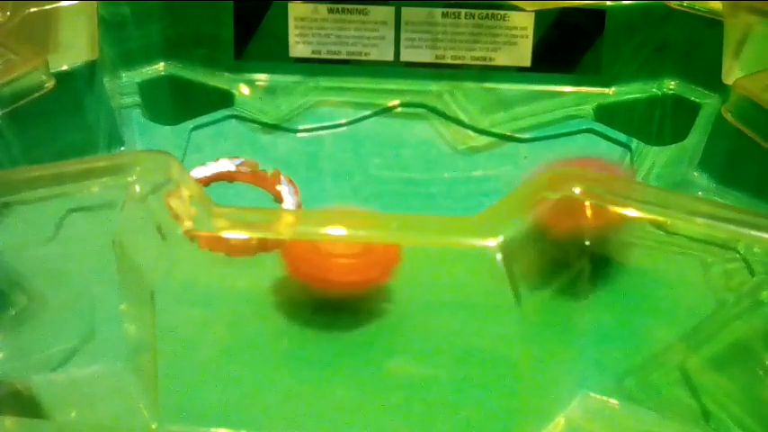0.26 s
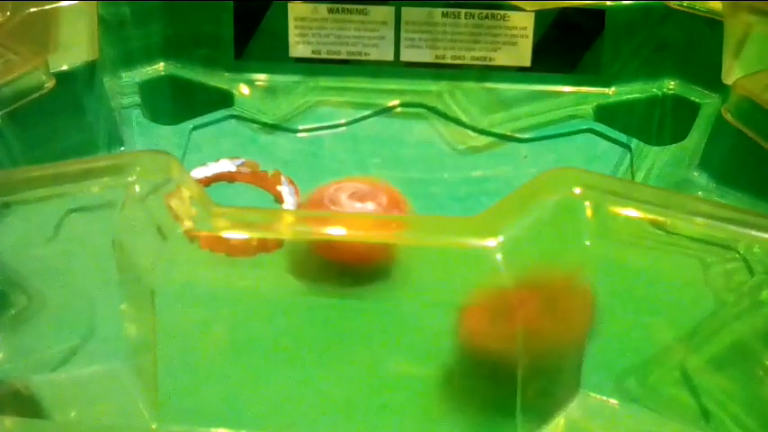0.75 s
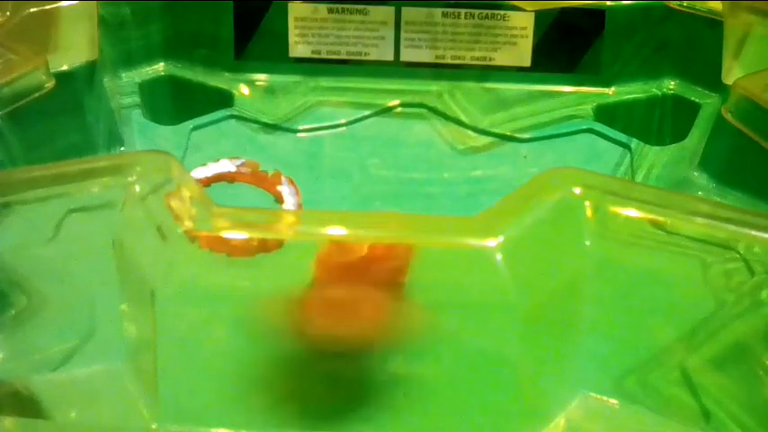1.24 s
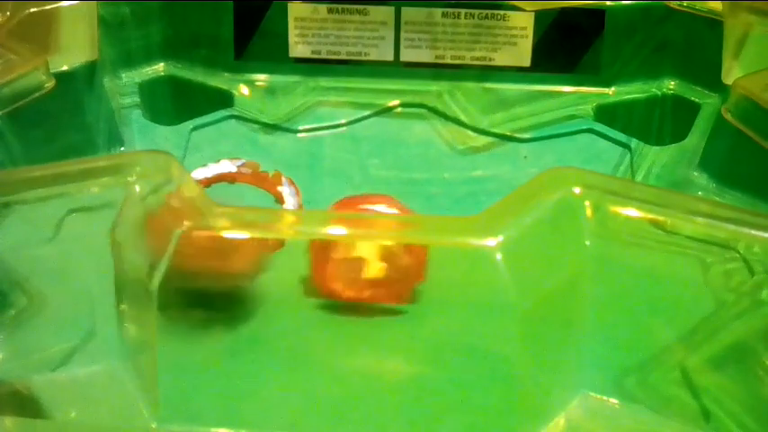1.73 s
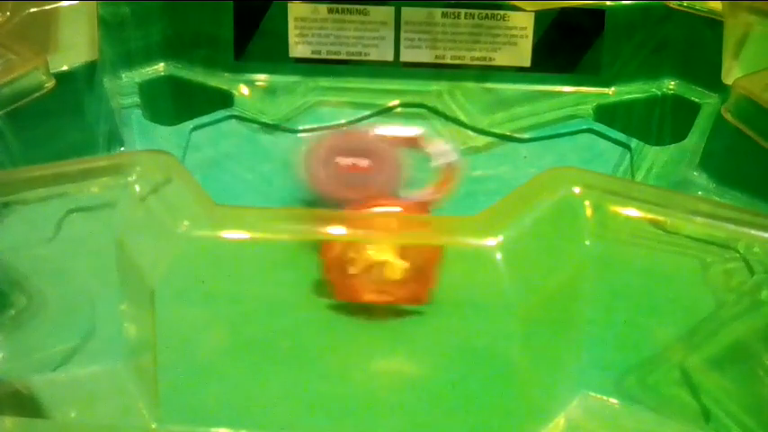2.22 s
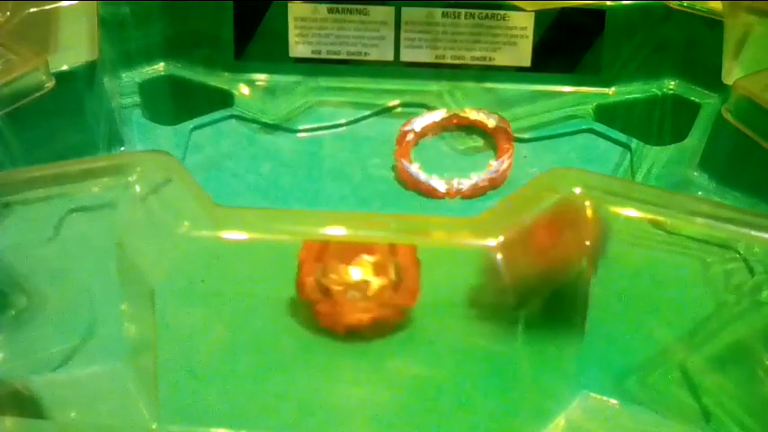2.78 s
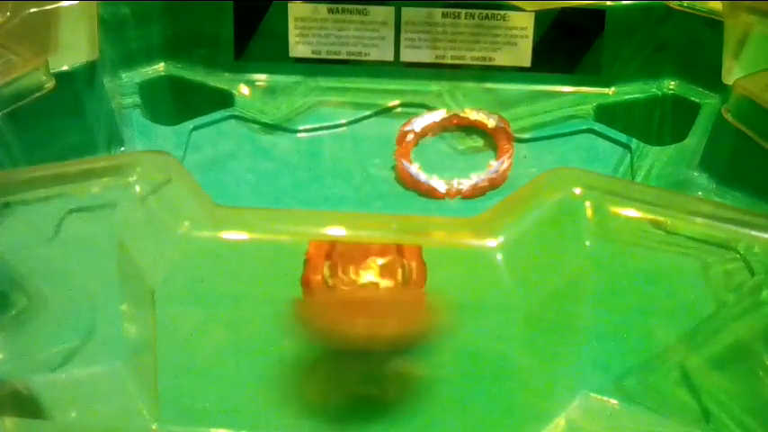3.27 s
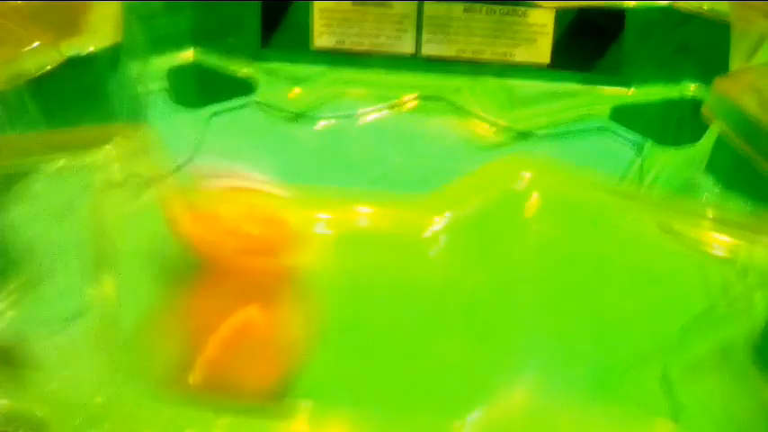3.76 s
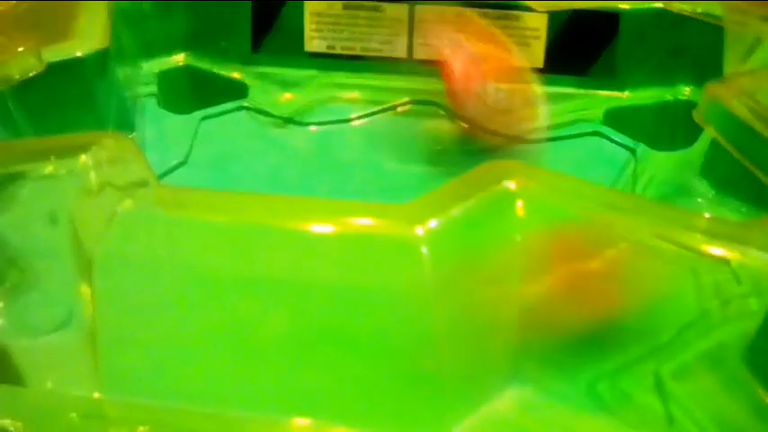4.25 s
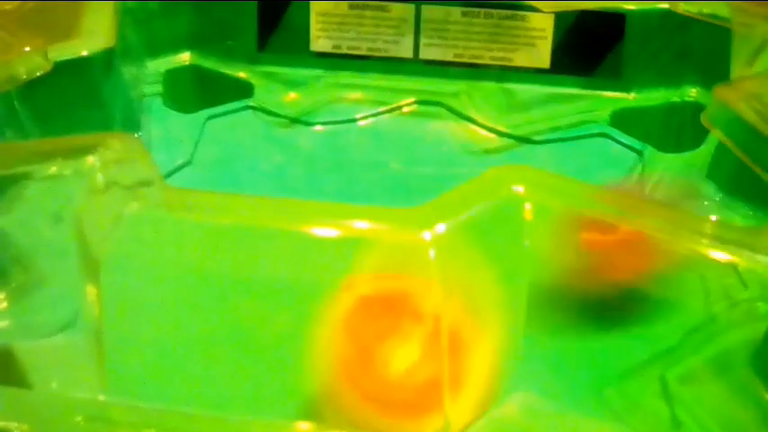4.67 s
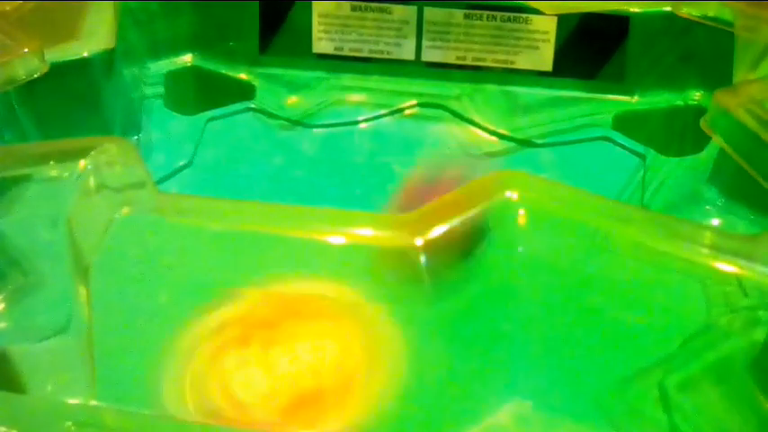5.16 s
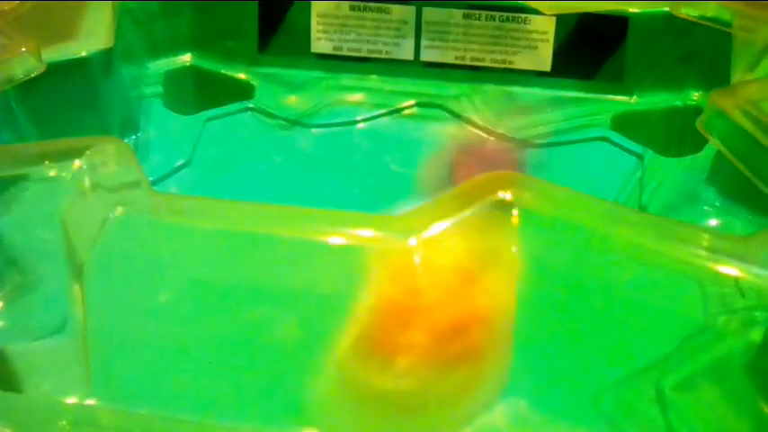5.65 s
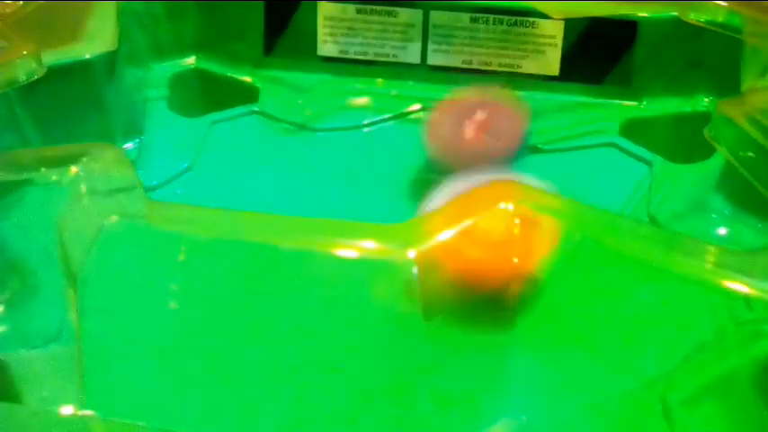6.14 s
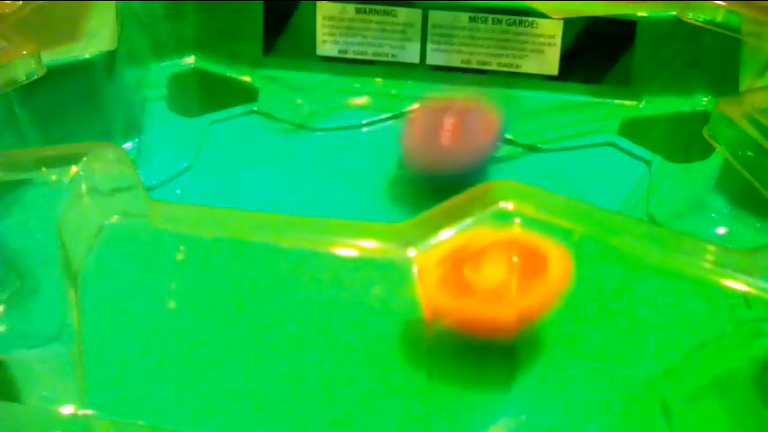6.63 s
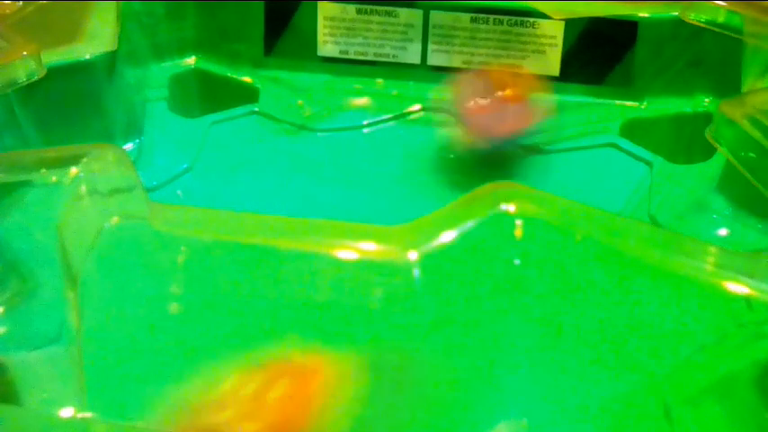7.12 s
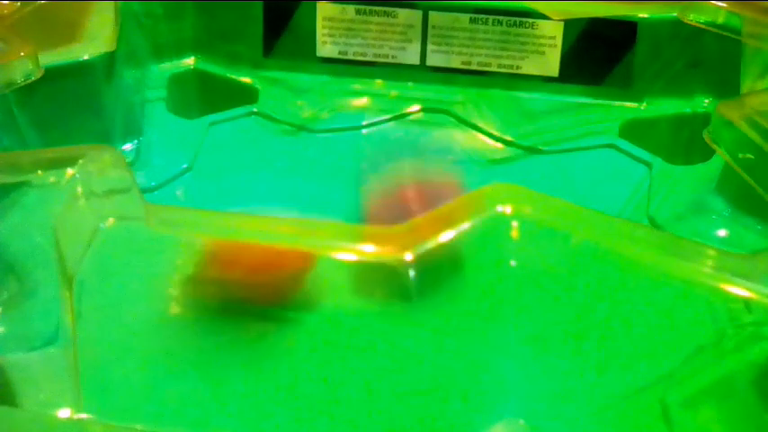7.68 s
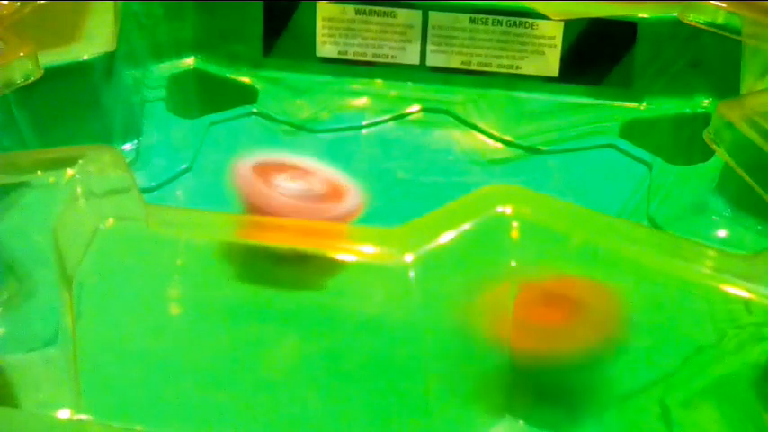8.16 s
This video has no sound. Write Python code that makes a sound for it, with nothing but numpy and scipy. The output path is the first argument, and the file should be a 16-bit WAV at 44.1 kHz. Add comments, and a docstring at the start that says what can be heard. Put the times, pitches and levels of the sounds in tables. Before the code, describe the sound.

Two toy tops spin in a thin plastic arena, heard from close above in a small room. Their tips roll with a faint whirr. Metal rims crack together with a brief high ring at the start and around 0.6, 1.2, 1.8, 2.2 and 3.3 seconds, among soft wall knocks. A short scrape swells from 0.5 to 0.8 seconds.

At 3.4 seconds everything cuts out for an instant. A much louder, hollow-sounding bout follows from 3.5 seconds: rapid chattering knocks on the walls, dull floor thumps, gritty skids and a low rolling rumble. Hard rim clashes land near 3.7, 4.9, 5.5, 6.1 and 6.8 seconds, with the strongest wall knocks at 3.6 and 5.1. Faint ticking appears around 6.4 seconds, and more knocks near 7. From 7.3 seconds the wobbling tops tick lightly and quickly, with two small plastic clacks just after 8 seconds.

```python
"""Two toy tops with metal rims clash as they spin in a thin plastic arena, heard from close above. Rims crack
together, ring and scrape, bodies knock on the walls and tips roll over the floor; every blow is a short chatter
of contacts. After the first bout the scene changes, with a brief gap between the two. The second bout is
heavier, has a hollow doubled sound, and calms to light ticking as the tops wobble."""
import sys
import numpy as np
from scipy import signal
from scipy.fft import rfft, irfft
from scipy.io import wavfile

SR = 44100
rng = np.random.default_rng(int(sys.argv[2]) if len(sys.argv) > 2 else 0)


def write(x):
    x = np.atleast_2d(x).T
    wavfile.write(sys.argv[1], SR, np.round(np.clip(x, -1, 1) * 32767).astype(np.int16))


N = 369999
TIME = np.arange(N) / SR
AGE = np.arange(SR // 2) / SR  # seconds since a blow

# Rim hits rim. Each row: start in seconds, chatter length in seconds, crack in dB, shell thud in dB.
CLASHES = [(-0.05, .006, -26.5, -39), (0.4198, .002, -32.5, -67), (.452, 0.0081, -40.5, -67),
           (.513, .0023, -38.5, -51), (0.557, 0.0098, -37, -53), (.576, 0.0057, -19.5, -31.5),
           (0.783, 0.0023, -33, -78), (1.1747, 0.007, -22.5, -30), (1.389, .002, -44.5, -53),
           (1.604, .0034, -39.5, -78), (1.751, 0.0074, -50.5, -56.5), (2.064, 0.0042, -47.5, -39.5),
           (1.773, 0.0055, -41, -56), (1.784, 0.0055, -20, -31.5), (2.2453, 0.0042, -19.5, -32),
           (3.334, .003, -26.5, -40), (3.571, 0.0059, -35.5, -37.5), (3.715, .01, -12, -23),
           (4.048, 0.0035, -31.5, -27.5), (4.243, 0.0019, -29.5, -40), (4.945, 0.0091, -11, -62),
           (5.537, 0.0085, -11, -25), (5.865, 0.0023, -27.5, -31), (6.065, .013, -16.5, -27.5),
           (6.777, 0.012, -13.5, -27.5)]
# The bright crack, the shell's thud and the wash after them. Each row: frequency in Hz, level in dB.
RIM_CRACK = [(1500, -19.5), (2300, -13.5), (3200, -11.5), (4500, -5), (5600, 1), (6600, 1), (7800, -1.5),
             (9500, -12), (12000, -16.5), (15500, -24.5)]
SHELL_THUD = [(60, -26), (160, 1), (300, -3), (480, -2), (700, 1), (1100, -1), (2000, -6), (3000, -24)]
AFTER_RING = [(70, -13), (170, 11.5), (400, -4.5), (1000, 4), (2000, -8.5), (3300, -7), (5000, -5.5),
              (6500, 5.5), (8000, -1), (10500, -14), (15500, -27.5)]
# The singing metal. Each row: pitch in Hz, level in dB, ring time in seconds.
RIM_MODES = [(4985, -10, .22), (5733, -8, .3), (6148, 0, .45), (6487, -3, .25), (6961, -8, .22),
             (7569, -10, .25), (9399, -15, .2), (10690, -14, .38), (11359, -19, .3), (13517, -26, .25)]
# A longer grind leaves more ring. Each row: chatter length in seconds, ring against the crack in dB.
RING_SHARE = [(.003, -38.5), (.006, -19.5), (.012, -15.5)]


def clashes():
    """Metal rims crack together, jolt the shell, and leave rims and arena ringing."""
    out = np.zeros(N)
    for start, length, crack_db, shell_db in CLASHES:
        contacts = chatter(length, first_db=-7, last_db=-4, bounce_db=-19, scatter_db=4)
        treble_db = 0.42 * min(crack_db + 20.5, 0)  # a graze is duller
        crack = colour(colour(burst(0.011), RIM_CRACK), [(7000, 0.0032), (13000, treble_db)])
        add(out, start, strike(contacts, crack, crack_db))
        add(out, start, strike(contacts, colour(burst(0.065), SHELL_THUD), shell_db))
        wash = undb(0.5) * unit(colour(burst(0.43), AFTER_RING), 0.1)
        # a quick, clean blow lets the rims sing; a long chatter damps them
        sing_db = np.interp(length, [.005, .012], [1, -8])
        metal = undb(sing_db) * unit(ring(RIM_MODES, scatter_db=3.5, detune=.003), .08)
        ring_db = crack_db + np.interp(length, *np.transpose(RING_SHARE))
        add(out, start + length / 2, undb(ring_db) * (wash + metal))
    return out


# Top hits arena. Each row: start in seconds, chatter length in seconds, force in dB,
# favoured resonance in Hz (a low one is a landing on the floor).
KNOCKS = [(1.011, 0.0046, -49, 1045), (1.042, 0.0018, -50, 1130), (1.097, 0.0027, -50.5, 1020),
          (1.801, 0.0089, -33.5, 582), (1.859, 0.0049, -35, 794), (2.005, 0.0034, -39.5, 690),
          (2.1086, 0.0039, -33.5, 784), (2.253, 0.017, -31, 616), (2.285, 0.048, -34, 381),
          (3.525, 0.021, -29.5, 585), (3.6126, .022, -6, 805), (3.868, 0.035, -26, 318),
          (3.9565, 0.011, -23, 837), (3.993, 0.0085, -25.5, 1275), (4.012, .013, -19, 520),
          (4.148, 0.027, -20.5, 565), (4.277, 0.021, -24.5, 389), (4.357, 0.0096, -22, 1097),
          (4.4213, 0.0063, -28.5, 550), (4.465, 0.018, -31, 523), (4.551, 0.02, -20, 753),
          (4.642, 0.0097, -14.5, 978), (4.669, 0.0053, -14, 580), (4.723, 0.01, -17, 840),
          (4.742, 0.02, -14, 749), (4.781, 0.0071, -14, 571), (4.803, 0.017, -19, 547),
          (4.88, 0.0073, -31, 965), (4.99, 0.0076, -25, 195), (5.102, .018, -7, 757),
          (5.1775, 0.0084, -9.5, 854), (5.243, .012, -27, 237), (5.386, 0.0062, -30.5, 597),
          (5.443, .0092, -31.5, 773), (5.611, 0.0095, -14, 515), (5.666, 0.019, -11, 814),
          (5.684, 0.019, -15.5, 183), (5.751, .028, -13.5, 551), (5.8892, 0.015, -20.5, 213),
          (5.9793, 0.009, -25.5, 205), (6.004, 0.0047, -27.5, 330), (6.941, .015, -24, 527),
          (6.973, 0.027, -28.5, 335), (7.055, 0.0082, -21.5, 528), (7.119, .019, -21, 549),
          (7.183, .009, -34, 503), (7.217, .017, -32, 194), (7.602, 0.016, -39, 1052),
          (7.953, 0.0085, -32.5, 759), (8.3433, .015, -37, 775)]
# The walls' knock and the floor's boom. Each row: pitch in Hz, level in dB, ring time in seconds.
WALL_MODES = [(403, 11.5, 0.019), (487, -25, 0.033), (588, 0.5, 0.19), (759, 0, 0.076), (798, 4.5, 0.11),
              (993, 12.5, 0.016), (1128, -20, 0.035), (1280, -2, 0.11), (1688, 1, 0.0083)]
FLOOR_MODES = [(71, -9.5, 0.35), (108.7, -6, 0.22), (193.4, -3, 0.13), (232, -17.5, 0.27),
               (267, -5.5, 0.037), (327.8, -5.5, 0.15)]
# The wall's dull thwack and the sharp crack on top. Each row: frequency in Hz, level in dB.
WALL_THWACK = [(150, -42), (330, -6), (520, 7), (850, 0.5), (1300, 0), (2000, -3), (3000, -34)]
PLASTIC_CRACK = [(1400, -12.5), (2100, 0), (3200, -1.5), (4800, -2), (6600, 1), (8000, -10), (10000, -16.5),
                 (15500, -38)]
# A short blow bites hardest at first touch. Each row: chatter length in seconds, first contact in dB.
FIRST_TOUCH = [(.008, 6), (.016, -0.5), (.03, 0)]


def knocks(rows, extra_crack_db=0):
    """A top hits the arena: the contact cracks, the wall rings and the floor booms."""
    walls, floor = np.zeros(N), np.zeros(N)
    for start, length, force_db, favoured_hz in rows:
        landing = np.interp(favoured_hz, [200, 420], [1, 0])  # 1 on the floor, 0 on the wall
        wall_db = force_db - 5 * landing
        bite_db = np.interp(length, *np.transpose(FIRST_TOUCH))
        contacts = chatter(length, first_db=bite_db, last_db=-5.5, bounce_db=-22.5, scatter_db=5.5)
        add(walls, start, undb(force_db - 4) * flex(contacts, favoured_hz, t60=.044))
        # the longer the top leans on the wall, the more the favoured resonance stands alone
        lean_db = 140 * (min(length, .025) - .012)
        tone = ring(WALL_MODES, scatter_db=-1, detune=0.016)
        add(walls, start, strike(contacts, tone, wall_db - lean_db - 6))
        thwack = colour(burst(0.021), WALL_THWACK)
        add(walls, start, strike(contacts, thwack, wall_db - lean_db - 2.5))
        # past 14 ms a contact is a lean, and its crack fades
        crack_db = wall_db - 3 + extra_crack_db - 550 * max(length - 0.014, 0)
        treble_db = 0.5 * min(crack_db + 33, 0)  # a gentle contact is duller
        crack = colour(burst(0.019) + undb(-16) * burst(0.017), PLASTIC_CRACK)
        crack = colour(crack, [(8000, 0), (14000, treble_db)])
        add(walls, start, strike(contacts, crack, crack_db))
        # a wall hit passes only so much on to the floor
        boom_db = landing * force_db + (1 - landing) * min(force_db - 0.5, -27)
        boom = ring(FLOOR_MODES, scatter_db=1, detune=.02)
        add(floor, start, strike(contacts, boom, boom_db - 1.5, settle=0.016))
    # the thin plastic radiates little deep bass
    return low_cut(walls, hz=90) + low_cut(floor, hz=98)


def flex(contacts, hz, t60):
    """One wall resonance gathers energy from every contact and rings on in step."""
    swing = np.sqrt(np.abs(signal.fftconvolve(fade(t60) ** 2, contacts ** 2)))[:len(AGE)]
    return unit(swing * np.sin(2 * np.pi * hz * AGE), len(contacts) / 2 / SR + 0.0014)


# Runs of light ticking. Each row: first and last tap in seconds, taps per second,
# first and last force in dB.
WOBBLES = [(1.883, 1.944, 33, -40, -41), (2.165, 2.215, 40, -40, -40), (6.325, 6.568, 25, -42, -46),
           (7.329, 7.53, 20, -32, -34), (7.688, 8.122, 18.5, -37, -38)]


def wobble_taps():
    """A leaning top taps the arena once each wobble, each time on some resonance of the wall."""
    rows = []
    for first, last, per_second, first_db, last_db in WOBBLES:
        count = round((last - first) * per_second) + 1
        starts = np.linspace(first, last, count)
        forces_db = np.linspace(first_db, last_db, count) - 1
        for start, db, (softness, place, drag) in zip(starts, forces_db, rng.uniform(-1, 1, (count, 3))):
            hz = WALL_MODES[int(4 * (place + 1))][0]
            length = .012 * 2 ** (drag / 2)
            rows.append((start, length, db - 1.06 * softness, hz))
    return knocks(rows, extra_crack_db=1.5)


# Body hits body. Each row: start in seconds, chatter length in seconds, force in dB, pitch in Hz.
CLACKS = [(6.609, 0.0095, -20.5, 4660), (6.64, 0.018, -31.5, 5100), (8.152, 0.005, -29, 2830),
          (8.284, 0.0051, -21.5, 2940)]


def clacks():
    """Small hard-plastic bodies meet with a short, hollow note."""
    spectrum = [(1700, -77), (2300, -7), (2700, -2.5), (3500, -13), (5200, -7.5), (7000, -7.5),
                (8500, -20.5), (15000, -39)]
    out = np.zeros(N)
    for start, length, force_db, hz in CLACKS:
        snap = unit(colour(burst(0.012) + undb(-39) * burst(0.3), spectrum))
        contacts = chatter(length, first_db=-18, last_db=-6, bounce_db=-2, scatter_db=3.5)
        note = ring([(hz, 0, .014), (hz * 1.08, -3, .012)], scatter_db=1, detune=.004)
        add(out, start, strike(contacts, snap, force_db - 4))
        add(out, start, strike(contacts, note, force_db - 3))
    return out


def scrape(start=0.51, end=.804, edge_s=.008, spin_hz=62, start_db=-50, swell_db_per_s=68):
    """A rim grinds ever harder along the wall, pulsing once each turn, then lets go."""
    rasp = [(1500, -49), (2900, -4), (4300, 0.5), (6000, 7), (7500, 8), (8500, -4.5),
            (11000, -11), (15500, -39)]
    modes = [(3100, -9, .008), (4300, -8, .01), (6100, -4, .016), (7350, 0, .006), (7800, -3, .005)]
    contacts = grains(3000, spread_db=2.5) * (1 + 0.33 * np.sin(2 * np.pi * spin_hz * TIME))
    singing = signal.fftconvolve(contacts, ring(modes, scatter_db=1, detune=.002))[:N]
    grind = unit(colour(contacts, rasp)) + undb(-5) * unit(singing)
    touching = np.clip(np.minimum(TIME - start, end - TIME) / edge_s + .5, 0, 1)
    swell_db = swell_db_per_s * (np.minimum(TIME, end) - start)
    return unit(grind) * touching * undb(start_db + swell_db)


def opening_ring(hz=6148, db=-48, t60=0.51):
    """A rim is already singing from a clash as the scene opens."""
    return undb(db) * np.exp(-np.log(1000) * TIME / t60) * np.sin(2 * np.pi * hz * TIME)


# The sandy sound of a tip on plastic. Each row: frequency in Hz, level in dB.
TIP_GRIT = [(1500, -17), (2300, 0), (3300, 1.5), (4100, 0.5), (5200, -2), (6400, 6), (7200, -0.5),
            (8200, -4), (10000, -16), (15500, -32)]


def skids(against_blow_db=-26, settle_s=0.074):
    """Each clash or knock throws the tips sideways, and they skid grittily until they settle."""
    kicks = np.zeros(N)
    for start, length, db, _ in CLASHES + KNOCKS:
        add(kicks, start + length, undb([db + against_blow_db]) ** 2)
    energy = signal.lfilter([1], [1, -np.exp(-2 / settle_s / SR)], kicks)
    return unit(colour(grains(6400, spread_db=7), TIP_GRIT)) * np.sqrt(energy)


# How hard the tips work the floor in each bout. Each row: time in seconds, effort in dB.
EFFORT_FIRST = [(0.0, -56), (0.38, -62), (0.71, -56), (1.8, -56.5), (1.99, -53.5), (2.21, -53.5),
                (2.42, -60), (2.72, -63), (3.18, -60.5), (3.3, -63)]
EFFORT_SECOND = [(3.53, -35.5), (3.58, -44), (3.69, -46), (3.81, -26), (4.39, -34.5), (4.77, -27),
                 (5.43, -29), (5.84, -29), (6.18, -35.5), (6.62, -43), (6.84, -41.5), (6.96, -21.5),
                 (7.11, -30.5), (8.38, -40.5)]
# The floor's rumble in each bout. Each row: frequency in Hz, level in dB.
RUMBLE_FIRST = [(25, -19.5), (70, -2.5), (170, 3.5), (290, -8.5), (550, -5), (780, -12), (1000, -13.5),
                (1330, -11.5), (1700, -14.5), (3000, -22.5), (4500, -52.5)]
RUMBLE_SECOND = [(25, -12.5), (60, -9.5), (103, 4), (145, -12), (198, 5.5), (320, -9), (420, -1.5),
                 (560, -5.5), (1000, -9), (1800, -16.5), (3000, -36), (4500, -44)]
# The whirr of a spinning body. Each row: pitch in Hz, level in dB, ring time in seconds.
WHIRR_MODES = [(1080, 3, 0.049), (1273, 2.5, 0.032), (3170, -4.5, 0.035), (5810, -5, .015),
               (6340, -13, .02)]


def rolling(effort, spectrum, wobble_db, tick_db, rumble_db, grit_db, whirr_db, wobble_hz=19.7):
    """Tips run over the floor and shake the bodies; each wobble presses harder and ticks faintly."""
    effort_db = np.interp(TIME, *np.transpose(effort))
    drift = np.interp(TIME, np.arange(80) / 8, rng.standard_normal(80))
    turns = np.cumsum(wobble_hz * (1 + .1 * drift)) / SR
    press_db = wobble_db * np.cos(2 * np.pi * turns)
    ticking_db = tick_db * rng.uniform(0, 1, 400)[turns.astype(int)] * np.exp(-(turns % 1) / 0.13)
    body = ring(WHIRR_MODES, scatter_db=0, detune=0)
    whirr = unit(signal.fftconvolve(grains(1000, spread_db=-1.5), body)[:N])
    whirr *= undb(whirr_db + 3 * drift)  # swells as the wobble quickens
    rumble = unit(colour(grains(1200, spread_db=3), spectrum))
    grit = unit(colour(grains(4400, spread_db=2.5), TIP_GRIT)) * undb(grit_db + ticking_db)
    return ((rumble + whirr) * undb(rumble_db) + grit) * undb(effort_db + press_db)


# Close echoes in the second bout. Each row: delay in seconds, level in dB.
DOUBLING = [(.003787, -7), (.01118, -15)]


def hollow_doubling(x):
    """Copies a few milliseconds late comb the sound and turn it hollow."""
    return x + sum(undb(db) * np.roll(x, round(delay * SR)) for delay, db in DOUBLING)


def room(x, t60, wet_db):
    """A small room answers after a few milliseconds, duller than the direct sound."""
    build_up = 1 - np.exp(-(AGE / 0.0047) ** 2)
    tail = colour(burst(t60) * build_up, [(100, 7), (1000, -1.5), (6000, -6), (15000, -11.5)])
    return x + undb(wet_db) * signal.fftconvolve(x, tail / np.sqrt(np.sum(tail ** 2)))[:N]


def chatter(length, first_db, last_db, bounce_db, scatter_db, count=9):
    """The lobes of a spinning rim bite in, land several times, then bounce off ever more lightly."""
    when = 2 * (np.arange(count) + rng.uniform(0, 1, count)) / count  # in chatter lengths
    when[0] = 0
    db = np.interp(when, [0, 1 / 3, 1, 4 / 3, 2], [first_db, 0, last_db, bounce_db, 2 * bounce_db])
    size = undb(db + scatter_db * rng.standard_normal(count)) * rng.choice([-1, 1], count)
    return np.bincount((when * length * SR).astype(int), size, minlength=int(2 * length * SR))


def strike(contacts, response, db, settle=0.0045):
    """Play a response with the contacts; db is the level before they bounce off."""
    return undb(db) * unit(signal.fftconvolve(response, contacts), len(contacts) / 2 / SR + settle)


def ring(modes, scatter_db, detune):
    """Modes (Hz, dB, t60) after one tap; the strike point shifts their shares and pitch a little."""
    chance = rng.standard_normal((len(modes), 3))
    out = np.zeros(len(AGE))
    for (hz, db, t60), (share, shift, polarity) in zip(modes, chance):
        tone = np.sin(2 * np.pi * hz * (1 + detune * shift) * AGE)
        out += np.sign(polarity) * undb(db + scatter_db * share) * fade(t60) * tone
    return out


def burst(t60, rise=0.0001):
    """Countless close modes: noise that builds quickly and dies away."""
    return rng.standard_normal(len(AGE)) * fade(t60) * (1 - np.exp(-AGE / rise))


def grains(per_second, spread_db):
    """Random tiny contacts of uneven size."""
    hit = rng.uniform(0, 1, N) < per_second / SR
    return hit * rng.choice([-1, 1], N) * undb(spread_db * np.minimum(rng.exponential(1, N), 4))


def fade(t60):
    """Exponential decay of 60 dB in t60 seconds."""
    return np.exp(-np.log(1000) * AGE / t60)


def colour(x, points, size=2048):
    """Minimum-phase EQ through (Hz, dB) points, so nothing rings ahead of a hit."""
    hz, db = np.transpose(points)
    bins_hz = np.arange(size // 2 + 1) * SR / size
    log_gain = np.log(undb(np.interp(np.log(bins_hz + 1), np.log(hz), db)))
    cepstrum = irfft(log_gain)
    cepstrum[1:size // 2] *= 2
    cepstrum[size // 2 + 1:] = 0
    return signal.fftconvolve(x, irfft(np.exp(rfft(cepstrum))))[:len(x)]


def low_cut(x, hz):
    """Second-order high-pass."""
    return signal.sosfilt(signal.butter(2, hz, "high", fs=SR, output="sos"), x)


def undb(db):
    """Decibels to gain."""
    return 10 ** (np.asarray(db) / 20)


def unit(x, seconds=None):
    """Scale to rms 1, over the whole sound or its first seconds."""
    head = x if seconds is None else x[:int(seconds * SR)]
    return x / np.sqrt(np.mean(head ** 2) + 1e-18)


def add(track, start, sound):
    """Mix a sound into the track at start seconds."""
    i = int(round(start * SR))
    part = sound[max(-i, 0):len(track) - i]
    track[max(i, 0):max(i, 0) + len(part)] += part


def scene(first_ends_s=3.41, second_starts_s=3.515):
    """The lighter first bout; after a brief gap the scene changes to the second, with its hollow doubling."""
    blows = clashes() + knocks(KNOCKS) + wobble_taps() + clacks() + scrape() + skids() + opening_ring()
    smooth_roll = rolling(EFFORT_FIRST, RUMBLE_FIRST, wobble_db=2.1, tick_db=4,
                          rumble_db=-1, grit_db=-10.5, whirr_db=-6)
    heavy_roll = rolling(EFFORT_SECOND, RUMBLE_SECOND, wobble_db=4.5, tick_db=9.5,
                         rumble_db=-5.5, grit_db=-13, whirr_db=-20)
    first = room(low_cut(blows, hz=190) + smooth_roll, t60=0.38, wet_db=-13)
    first += undb(-93) * rng.standard_normal(N)  # microphone hiss
    second = undb(-1.11) * hollow_doubling(room(blows + heavy_roll, t60=0.66, wet_db=-14.5))
    return (first * (TIME < first_ends_s) + second * (TIME > second_starts_s))[None]


def record(dry, cutoff_hz=15900):
    """The microphone overloads on the hardest blows, and the highest treble is cut."""
    clipped = dry / (1 + dry ** 6) ** (1 / 6)
    return signal.sosfilt(signal.ellip(10, .2, 80, cutoff_hz, fs=SR, output="sos"), clipped)


dry = scene()
out = record(dry)
write(out)
```